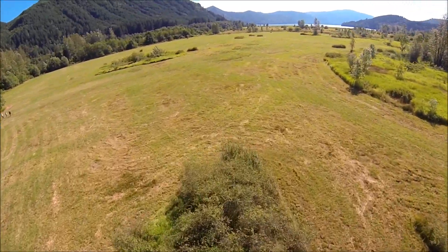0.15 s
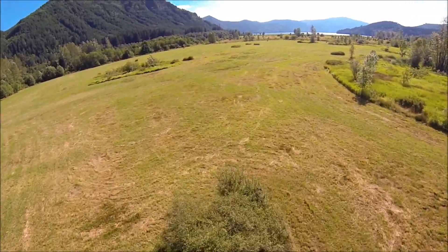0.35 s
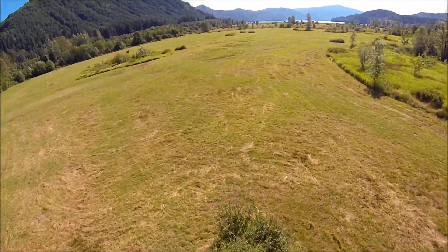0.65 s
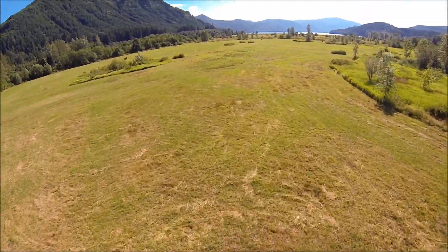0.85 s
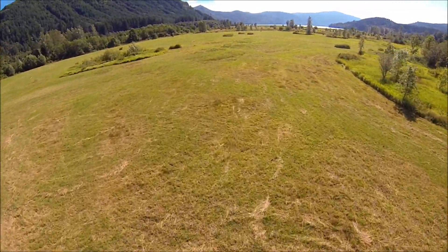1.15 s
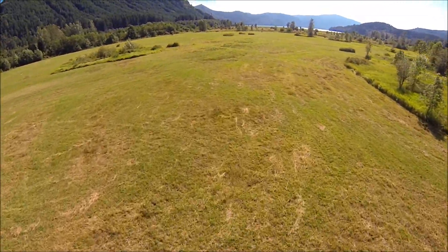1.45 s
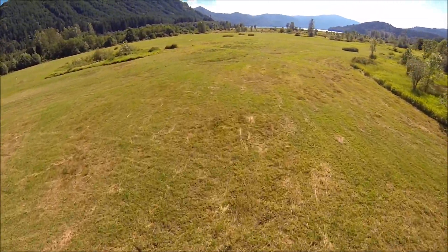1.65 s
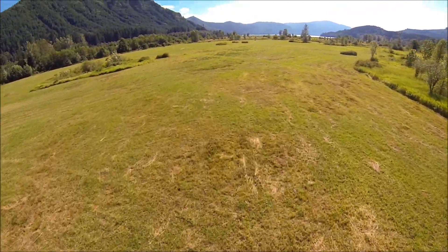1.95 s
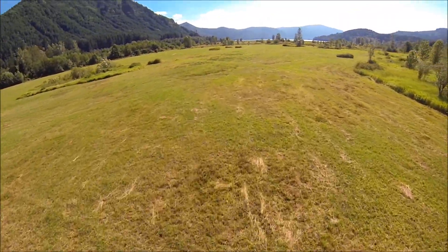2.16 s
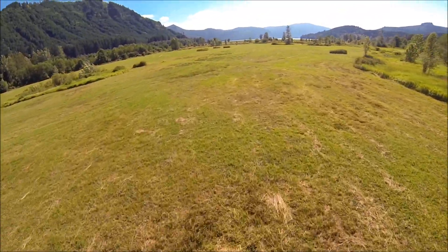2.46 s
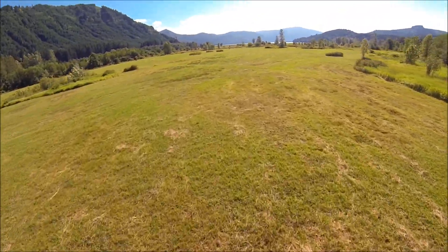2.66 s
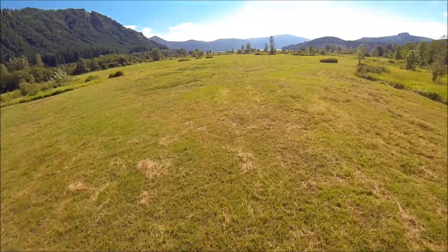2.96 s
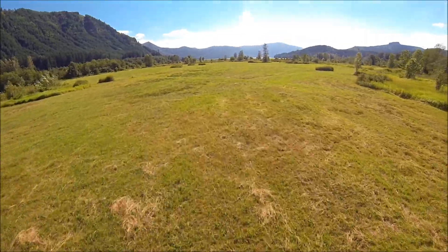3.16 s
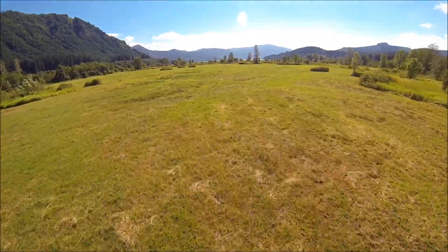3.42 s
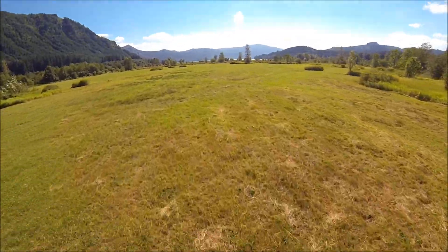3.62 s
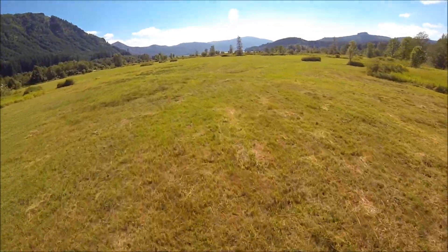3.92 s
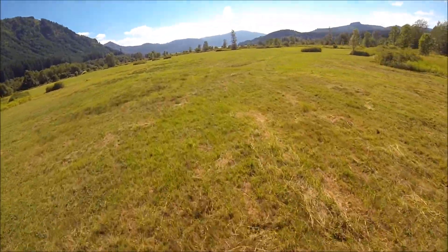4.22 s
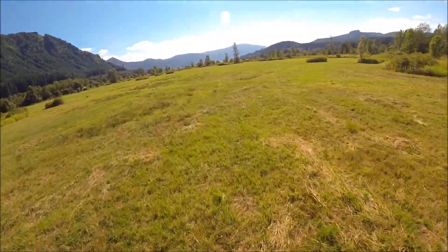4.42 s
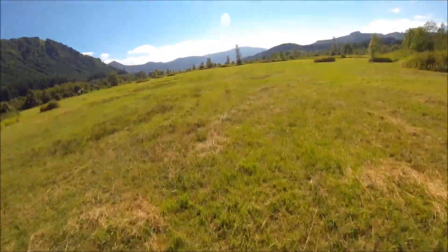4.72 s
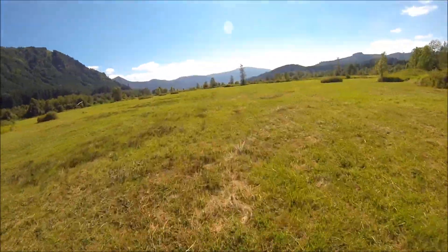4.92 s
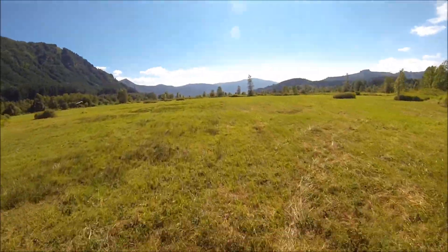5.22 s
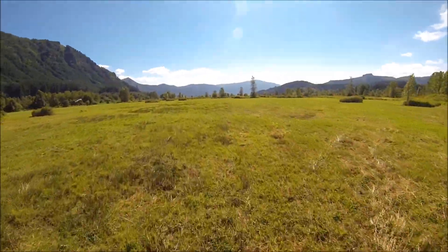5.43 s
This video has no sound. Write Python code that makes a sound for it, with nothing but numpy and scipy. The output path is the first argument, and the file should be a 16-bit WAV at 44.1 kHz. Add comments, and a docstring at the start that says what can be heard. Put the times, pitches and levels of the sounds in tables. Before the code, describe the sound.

Strong wind roars and buffets a small cased microphone flying low over a meadow, with mount ticks and a late burst of hard knocks.

```python
"""Wind over a small cased camera

Wind roars over the microphone of a small cased camera flying low across a meadow.
Shaped noise makes the wind: eddies buffet the port, gusts make it boom, air hisses along the case.
The mount ticks and scuffs as it flexes, then knocks hard a few times: impulses and tiny slips
excite decaying modes of the case, with crackle around the bright contacts.
After the knocks the roar sinks briefly. A faint high sizzle swells twice."""
import sys
import numpy as np
from scipy import signal
from scipy.io import wavfile
from scipy.ndimage import uniform_filter1d

SR = 44100
rng = np.random.default_rng(int(sys.argv[2]) if len(sys.argv) > 2 else 0)


def master(y):
    """Save y as 16-bit WAV."""
    cut = np.clip(np.atleast_2d(y).T, -1, 1)
    pcm = np.round(cut * 32767)  # scale
    wavfile.write(sys.argv[1], SR, pcm.astype(np.int16))


N = 246145  # length [samples]


def wind():
    """Turbulence: large eddies thump, smaller ones roar and rush; the roar's swings modulate the hiss."""
    # spectral density of each part of the airflow: (frequency [Hz], relative level [dB per Hz])
    buffet_spectrum = [(14, 0), (28, -1), (45, -0.5), (70, -7), (100, -7.5), (140, -16), (200, -36)]
    roar_spectrum = [(70, -18.5), (110, 1), (150, 2), (210, 2.5), (290, -1.5), (370, -18), (500, -24)]
    rush_spectrum = [(230, -7), (350, -1), (480, -2.5), (640, -7.5), (820, -10), (1100, -29), (1800, -30.5)]
    hiss_spectrum = [(500, -3.5), (850, 5), (1150, 1.7), (1600, -2.5), (2200, -7.5), (2750, -13),
                     (3600, -18.5), (4900, -27), (5800, -33.5), (7200, -41), (10000, -40), (12000, -48),
                     (14000, -52)]
    # low thumping at the port, before its uneven lumps: (time [s], level [dB])
    buffet_curve = [(0, -17), (0.25, -17), (0.55, -18.5), (1.3, -18), (1.72, -18), (2.1, -18.5),
                    (2.75, -17), (3.15, -19.5), (3.75, -19), (3.95, -20), (4.25, -19.5), (4.5, -19.5),
                    (4.75, -26), (5.15, -22.5), (5.58, -18.5)]
    # roar, which collapses around the hard knocks: (time [s], level [dB])
    roar_curve = [(0, -22.5), (0.9, -20.0), (1.3, -20), (1.55, -22), (1.95, -16), (2.1, -20.0),
                  (3.3, -17.5), (3.8, -19), (4.65, -19), (4.75, -31.5), (4.88, -20.5), (5.0, -28),
                  (5.1, -17), (5.35, -21.5), (5.58, -15)]
    # rush: (time [s], level [dB])
    rush_curve = [(0, -19.5), (.4, -17), (.53, -20), (.75, -18), (1.0, -19.5), (1.44, -20), (1.52, -25),
                  (1.98, -19.5), (2.35, -22), (2.92, -20), (3.15, -20.5), (3.68, -21), (3.84, -21),
                  (4.0, -20.5), (4.25, -23.5), (4.7, -23.5), (4.83, -29), (4.999, -31), (5.13, -25.5),
                  (5.58, -23.5)]
    # hiss of air along the case: (time [s], level [dB])
    hiss_curve = [(0.0, -29), (0.2, -27.5), (0.63, -29.5), (1.13, -28.5), (1.57, -32), (1.79, -31.5),
                  (2.05, -27.5), (2.33, -32), (2.56, -32), (2.87, -30.5), (3.16, -33.5), (3.7, -31),
                  (4.0, -35), (4.64, -37), (4.8, -44), (5.0, -42.5), (5.45, -40.5), (5.54, -36)]
    lump_db, lumps_per_s = 2, 8.3  # spread and rate of the lumps in the thumping
    case_ring_db = -16  # ring of the case in the airflow, against the hiss

    eddies = drift(50)  # shared by roar, rush and hiss
    lumps = lambda: from_db(lump_db * drift(lumps_per_s))
    buffet = steady(turbulence(buffet_spectrum, flicker_db=-0.5), seconds=0.098) * lumps()

    roar = turbulence(roar_spectrum, flicker_db=1.5) * from_db(0.31 * eddies)
    roar = steady(roar, seconds=0.21)

    # the instantaneous roar pressure also sways the level of rush and hiss
    rush = turbulence(rush_spectrum, flicker_db=1.5) * from_db(0.81 * eddies + 1.0 * roar)
    rush = steady(rush, seconds=0.16)

    ring = rms_one(steep_band(case(rng.standard_normal(N)), low_hz=1400, high_hz=5170))
    hiss = turbulence(hiss_spectrum, flicker_db=1.03) + from_db(case_ring_db) * ring
    hiss = rms_one(hiss * from_db(0.77 * eddies + 0.65 * roar))

    return (from_db(in_time(buffet_curve)) * buffet + from_db(in_time(roar_curve)) * roar
            + from_db(in_time(rush_curve)) * rush + from_db(in_time(hiss_curve)) * hiss)


def gusts():
    """Eddy size sets pitch: each gust booms in its own band, big eddies low, small ones hollow."""
    # gusts that catch the port: (middle [s], Gaussian half length [s], peak level [dB],
    # lowest frequency [Hz], highest frequency [Hz])
    gust_rows = [(0.31, 0.014, -14, 262, 520), (0.735, 0.036, -24.5, 478, 895),
                 (1.24, 0.2, -18.5, 230, 446), (2.04, .016, -15.5, 50, 100),
                 (2.07, 0.054, -27.5, 550, 1030), (2.145, .014, -19, 50, 110),
                 (2.25, 0.023, -24.5, 550, 1010), (2.705, 0.024, -15.5, 45.3, 110),
                 (2.842, 0.0089, -20, 397, 706), (2.973, 0.016, -17.5, 298, 600),
                 (3.278, 0.016, -14.5, 130, 230), (3.56, 0.014, -19, 300, 730),
                 (3.686, 0.06, -17, 240, 450), (3.98, .03, -19, 253, 527), (4.37, 0.013, -14.5, 280, 523)]
    out, t = np.zeros(N), np.arange(N) / SR
    for s, half_s, level_db, low_hz, high_hz in gust_rows:
        boom = steady(steep_band(rng.standard_normal(N), low_hz, high_hz), seconds=0.018)
        out += from_db(level_db) * swell(t - s, half_s) * boom
    return out


def clicks():
    """Impact excitation: an impulse with brief chatter rings the case beside a dry, direct crack."""
    # sharp contacts in the mount; light ones tick, heavy soft ones knock, hard ones snap:
    # (time [s], level over the first 5 ms [dB], lowest frequency [Hz], highest frequency [Hz])
    contacts = [(.2064, -48, 5470, 8500), (2.569, -21.5, 600, 1500), (2.811, -20, 600, 1500),
                (3.0824, -30, 1500, 7060), (3.3534, -24.5, 1450, 6200), (3.3640, -57, 7000, 13000),
                (3.5395, -15.5, 516, 990), (3.781, -26, 1500, 5500), (3.7908, -62, 7000, 12000),
                (3.8294, -35, 1500, 4040), (3.9139, -25, 1400, 4420), (3.9642, -23.5, 900, 1700),
                (3.975, -18, 800, 2100), (3.985, -21, 1450, 2400), (3.988, -17.5, 706, 1500),
                (3.9945, -27, 1400, 2400), (4.014, -16, 450, 950), (4.159, -42, 2430, 6500),
                (4.3705, -17.5, 446, 990), (4.3814, -35, 1900, 10000), (4.4567, -29.5, 1200, 2400),
                (4.4727, -29.5, 1300, 4000), (4.5855, -17.5, 1400, 5000), (4.588, -23, 1300, 2700),
                (4.6394, -18.5, 400, 900), (4.666, -18.5, 1300, 4700), (4.6732, -15, 710, 1400),
                (4.6762, -6, 725, 1670), (4.6777, -27, 1800, 9000), (4.696, -19, 400, 1500),
                (4.707, -33, 3600, 5400), (4.7098, -13.5, 430, 850), (4.712, -27, 1400, 2200),
                (4.7195, -30.5, 4500, 14000), (4.7203, -19, 2200, 6000), (4.7245, -34, 3000, 4200),
                (4.7285, -28.5, 1930, 5000), (4.7395, -34, 1500, 4500), (4.758, -17, 455, 1500),
                (4.761, -25, 1350, 2300), (4.765, -20.5, 606, 2020), (4.776, -34, 700, 1900),
                (4.806, -31, 800, 2190), (5.2215, -20.5, 450, 1300), (5.406, -26, 1290, 3300),
                (5.4495, -29, 1300, 2600)]
    chatter_s, crack_s = 0.0035, 0.0012  # decay times [s]
    crack_db = -31.5  # crack against the ring
    out, t = np.zeros(N), np.arange(SR // 8) / SR
    for s, level_db, low_hz, high_hz in contacts:
        decays = np.exp(-t / [[chatter_s], [crack_s]])
        chatter, crack = rng.standard_normal((2, len(t))) * decays
        impact = (t == 0) + 0.078 * chatter
        # a light part hardly stirs the low modes, a soft one hardly the high ones
        ring = rms_one(steep_band(case(impact), low_hz, high_hz))
        direct = rms_one(steep_band(crack, low_hz, 2 * high_hz))
        sound = ring + from_db(crack_db) * direct
        add(out, s, from_db(level_db) * sound / np.std(sound[t < .005]))
    return out


def scuffs():
    """Stick-slip friction: a rub is a short swell of tiny slips, heard directly and through the case."""
    # rubs of the mount: (middle [s], Gaussian half length [s], rms level within it [dB],
    # lowest frequency [Hz], highest frequency [Hz])
    rubs = [(2.841, 0.01, -22, 493, 2490), (2.955, 0.006, -21.5, 650, 1900), (2.99, 0.0078, -33, 900, 1900),
            (3.986, 0.019, -27, 700, 2200), (4.169, 0.0096, -37, 1480, 2590),
            (4.349, .009, -33, 1090, 2110), (4.37, 0.0048, -28, 1100, 2000), (4.6, .007, -35, 1400, 2600),
            (4.664, 0.007, -25, 680, 1930), (4.728, 0.012, -24, 720, 1600), (4.757, .016, -23.5, 450, 1200),
            (5.186, .006, -34, 750, 3000), (5.295, 0.0025, -44, 2000, 3900),
            (5.316, 0.0044, -38, 1100, 3900), (5.414, .003, -32, 1000, 2600),
            (5.452, 0.007, -38.5, 1300, 4300), (5.474, 0.0054, -31.5, 950, 3880),
            (5.497, 0.0027, -52, 1800, 4800), (5.523, 0.0037, -44, 1500, 4500)]
    slips_per_s, direct_db = 1400, -9  # slip rate; direct sound against the ring of the case
    out, t = np.zeros(N), np.arange(-SR // 8, SR // 8) / SR
    for s, half_s, level_db, low_hz, high_hz in rubs:
        slips = rng.standard_normal(len(t)) * (rng.random(len(t)) < slips_per_s / SR)
        rub = rms_one(case(slips)) + from_db(direct_db) * rms_one(slips)
        sound = steep_band(rub, low_hz, high_hz) * swell(t, half_s)
        add(out, s + t[0], from_db(level_db) * sound / np.std(sound[np.abs(t) <= half_s]))
    return out


def crackle(mount):
    """Random snaps of uneven size follow the mount's bright energy, so dull knocks hardly crackle."""
    crackle_db, spread_s = -19, 0.04  # level against the bright contacts; averaging time [s]
    snaps_per_s, snap_decay_s = 3500, 0.00037
    bright = steep_band(mount, low_hz=2300, high_hz=8000)
    strain = np.sqrt(np.abs(uniform_filter1d(bright ** 2, max(int(spread_s * SR), 1))))
    snaps = (rng.random(N) < snaps_per_s / SR) * rng.standard_normal(N)
    decay = np.exp(-1 / (snap_decay_s * SR))
    envelope = signal.lfilter([1], [1, -decay], np.abs(snaps) + 1e-18)
    grains = envelope * rng.standard_normal(N)
    return from_db(crackle_db) * strain * rms_one(steep_band(grains, low_hz=1500, high_hz=5200))


def sizzle():
    """Band-limited noise: a faint narrow hiss swells twice high above the roar."""
    # swells of the sizzle: (middle [s], Gaussian half length [s], peak level [dB])
    swell_rows = [(2.05, 0.062, -62.5), (2.25, .025, -63)]
    t = np.arange(N) / SR
    gain = sum(from_db(level_db) * swell(t - s, half_s) for s, half_s, level_db in swell_rows)
    narrow = signal.butter(2, [9700, 11100], "band", fs=SR, output="sos")
    return gain * rms_one(signal.sosfilt(narrow, rng.standard_normal(N)))


def case(force):
    """Modal superposition: damped resonances whose strengths and pitches vary with each touch."""
    # modes of the case: (frequency before detuning [Hz], level before the touch varies it [dB],
    # time to decay by 60 dB [s])
    modes = [(528, 15.5, 0.074), (827, 16, 0.024), (1208, 14, 0.011), (1623, 9, 0.02), (2058, 1, 0.034),
             (2520, -2.5, 0.017), (2950, -8, 0.018), (3400, -4, 0.018), (3780, -1.5, 0.0071),
             (4980, -2.5, 0.0042), (6600, -16.5, 0.0075), (8300, -9, 0.0021), (9800, -15, 0.006),
             (11500, -12, .004), (14000, -13, .003)]
    detune = 0.019  # largest share by which a mode shifts as the case flexes
    touches = 2 * rng.random((len(modes), 2)) - 1
    out = np.zeros(len(force))
    for k, ((hz, level_db, t60), (place, flex)) in enumerate(zip(modes, touches)):
        r = np.exp(-np.log(1000) / (t60 * SR))
        w = 2 * np.pi * hz * (1 + detune * flex) / SR
        ring = signal.lfilter([0, np.sin(w)], [1, -2 * r * np.cos(w), r * r], force + 1e-18)
        out += (-1) ** k * from_db(level_db + 2 * place) * ring  # signs alternate
    return out


def turbulence(spectrum, flicker_db):
    """Filtered noise: third-octave bands, each flickering a little on its own; rms 1."""
    hz, level_db = np.transpose(spectrum)
    edges = 12.5 * 2 ** (np.arange(32) / 3)
    white, out = rng.standard_normal((2, N + SR)), np.zeros(N)
    for k, (low, high) in enumerate(zip(edges, edges[1:])):
        if high > hz[0] and low < hz[-1]:
            band = signal.butter(3, [low, high], "band", fs=SR, output="sos")
            # neighbouring bands use separate noises; the first second lets the filter settle
            noise = signal.sosfilt(band, white[k % 2])[SR:]
            band_db = np.interp(np.log(low * high) / 2, np.log(hz), level_db)
            out += noise * from_db(band_db + flicker_db * drift(14.4))
    return rms_one(out)


def drift(rate):
    """Low-passed noise: smooth chance that changes about rate times a second; spread 1."""
    r = np.exp(-40 * np.pi * rate / SR)  # double pole, run at SR / 20
    white = rng.standard_normal(N // 20 + 2002)
    slow = signal.lfilter([1], [1, -2 * r, r * r], white)[2000:]
    return np.interp(np.arange(N) / 20, np.arange(len(slow)), rms_one(slow))


def steady(x, seconds):
    """Power normalisation: hold the mean power even over this time, keeping the quicker lumps."""
    return x / np.sqrt(uniform_filter1d(x ** 2, max(int(seconds * SR), 1)) + 1e-9)


def steep_band(x, low_hz, high_hz):
    """Cascaded filtering: a high-pass and a low-pass, 30 dB per octave each."""
    for hz, kind in ((low_hz, "high"), (high_hz, "low")):
        x = signal.sosfilt(signal.butter(5, min(hz, .45 * SR), kind, fs=SR, output="sos"), x)
    return x


def swell(t, half_s):
    """Gaussian envelope: a smooth rise and fall around t = 0."""
    return np.exp(-(t / half_s) ** 2 / 2)


def from_db(db):
    """Logarithmic level: decibels to amplitude gain."""
    return 10 ** (np.asarray(db) / 20)


def rms_one(x):
    """Effective value: scale to rms 1."""
    return x / np.sqrt(np.mean(x ** 2) + 1e-20)


def in_time(rows):
    """Linear interpolation: a level curve at every sample."""
    s, level_db = np.transpose(rows)
    return np.interp(np.arange(N) / SR, s, level_db)


def add(track, s, sound):
    """Superposition: mix a sound in from time s."""
    start = max(int(s * SR), 0)
    track[start:start + len(sound)] += sound[:max(N - start, 0)]


def scene():
    """Superposition: wind and case noises sum at the one microphone."""
    air = wind() + gusts() + sizzle()
    mount = clicks() + scuffs()
    return (air + mount + crackle(mount))[None]


def record(dry):
    """Soft saturation and band limiting: the highest peaks are rounded and the top is cut."""
    rounded = dry / (1 + dry ** 6) ** (1 / 6)
    # 70 dB down from 16 kHz upwards
    low_pass = signal.cheby2(16, 70, 16000, fs=SR, output="sos")
    return signal.sosfilt(low_pass, rounded)


dry = scene()
out = record(dry)
master(out)
```